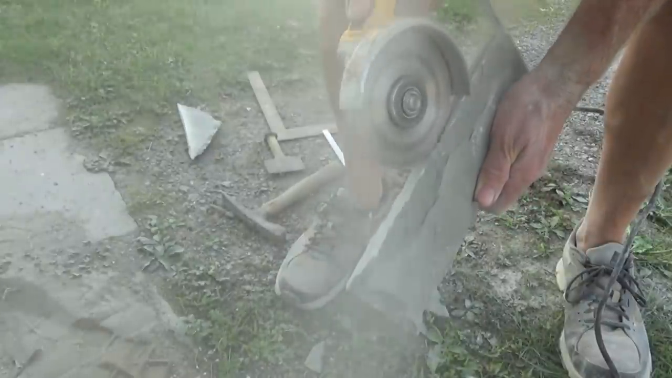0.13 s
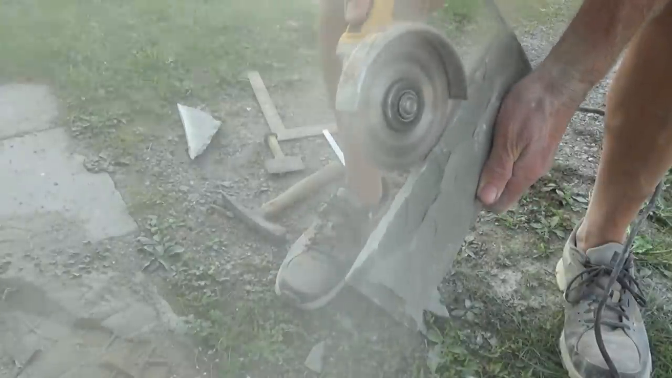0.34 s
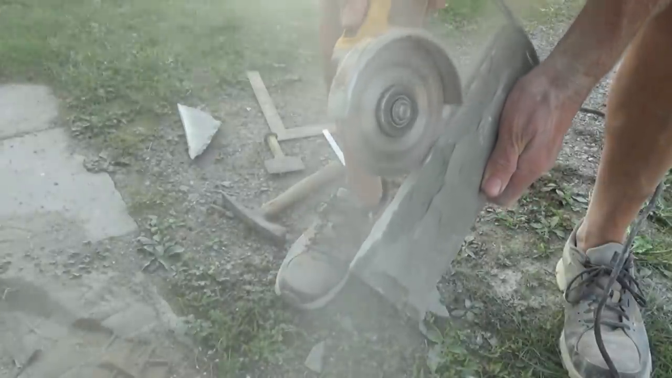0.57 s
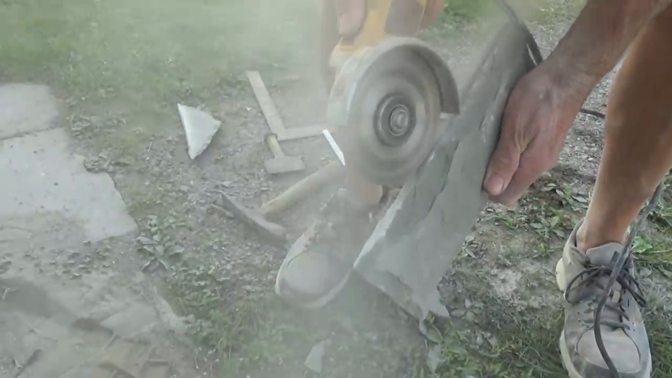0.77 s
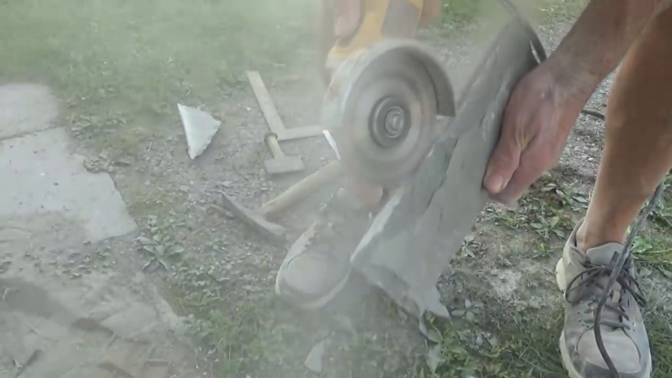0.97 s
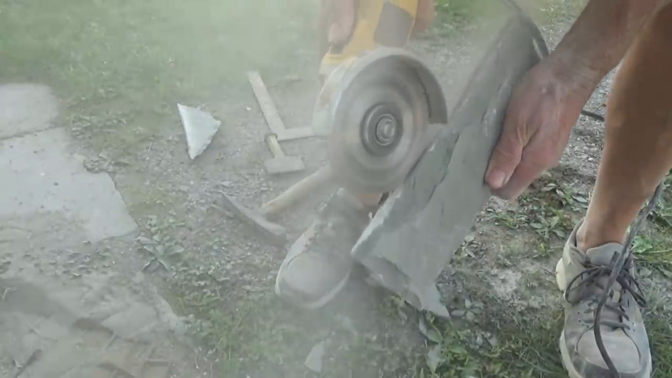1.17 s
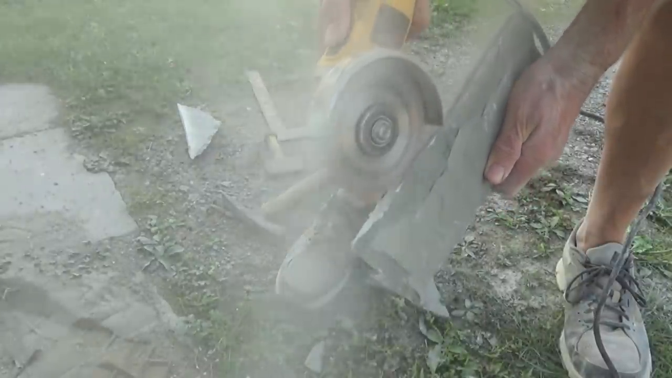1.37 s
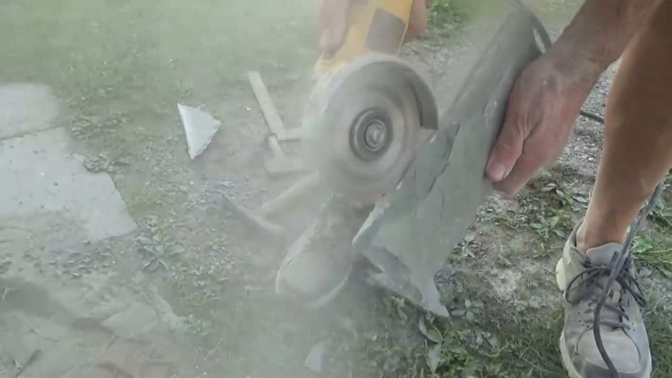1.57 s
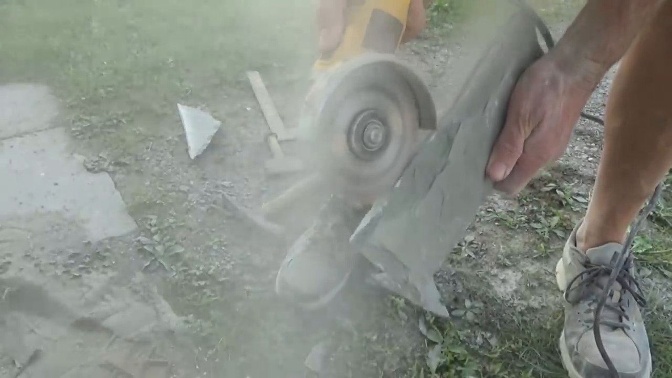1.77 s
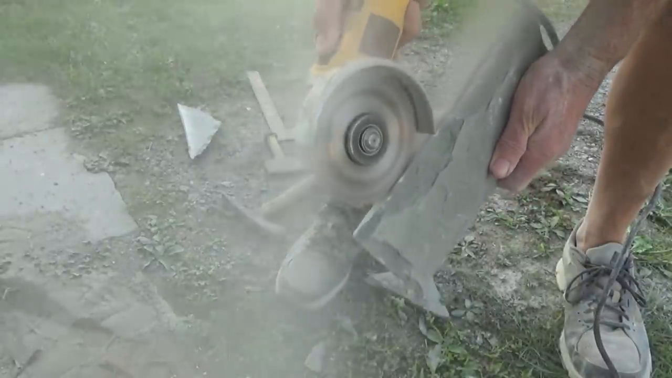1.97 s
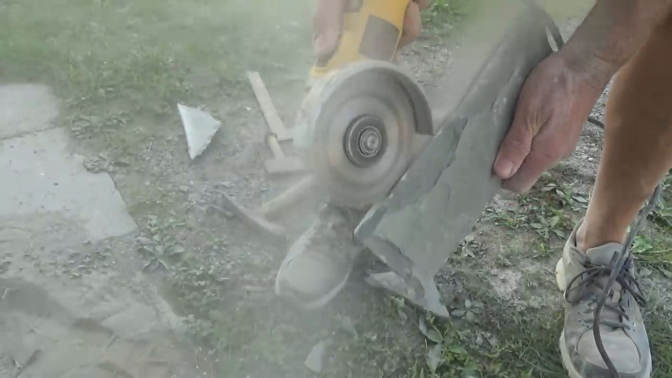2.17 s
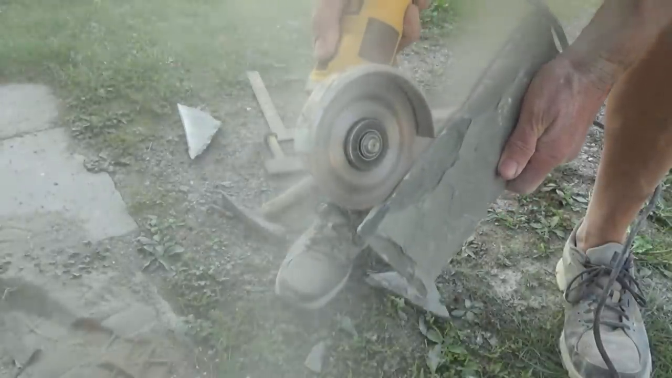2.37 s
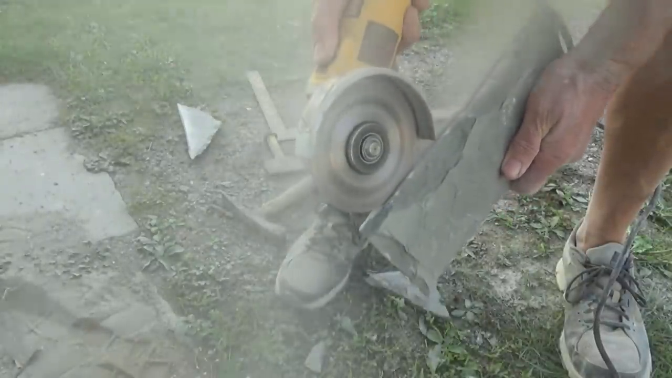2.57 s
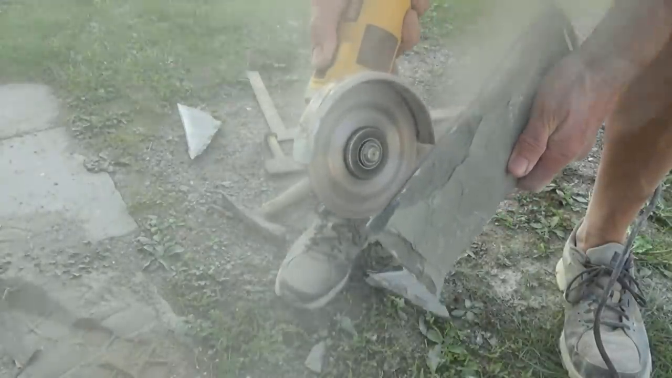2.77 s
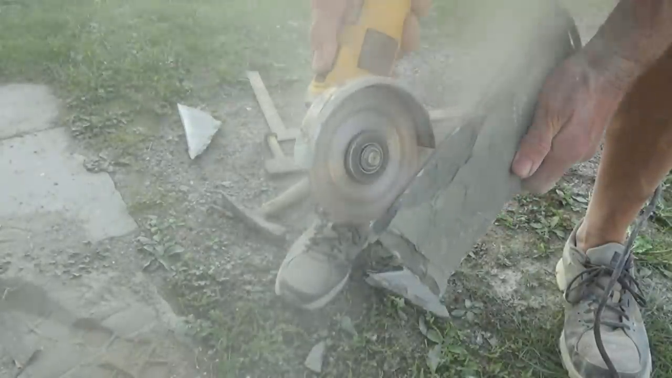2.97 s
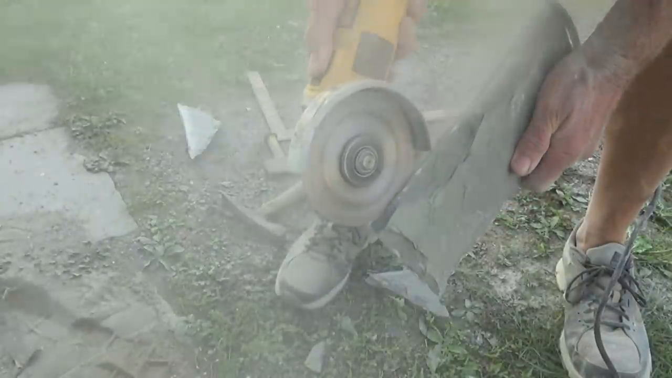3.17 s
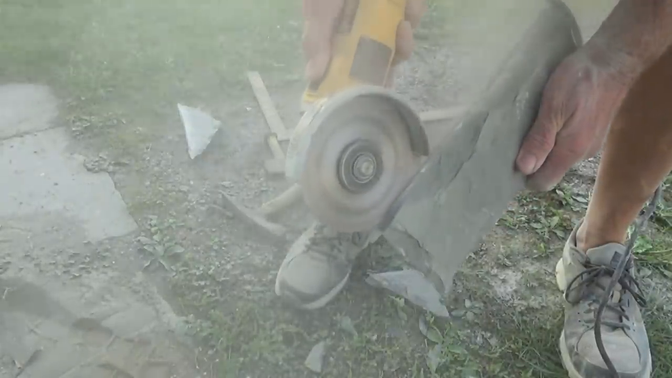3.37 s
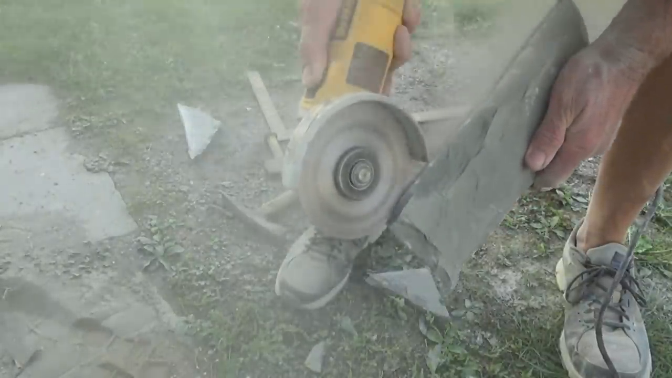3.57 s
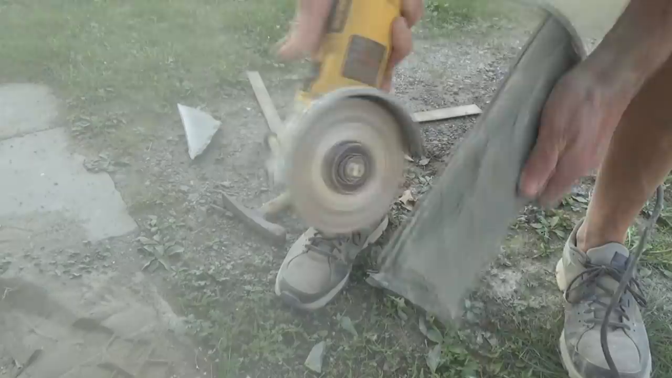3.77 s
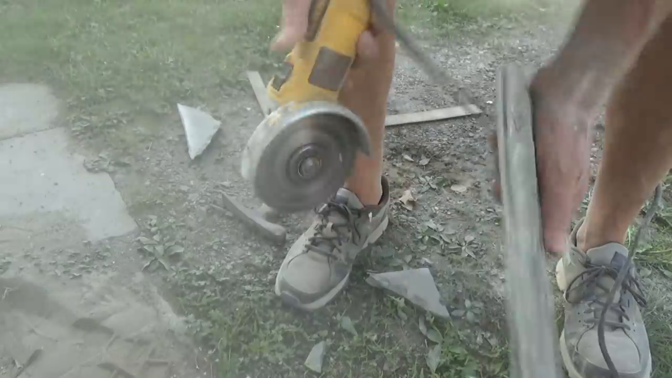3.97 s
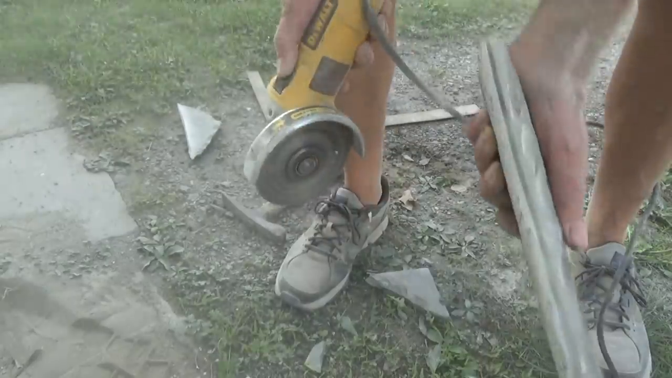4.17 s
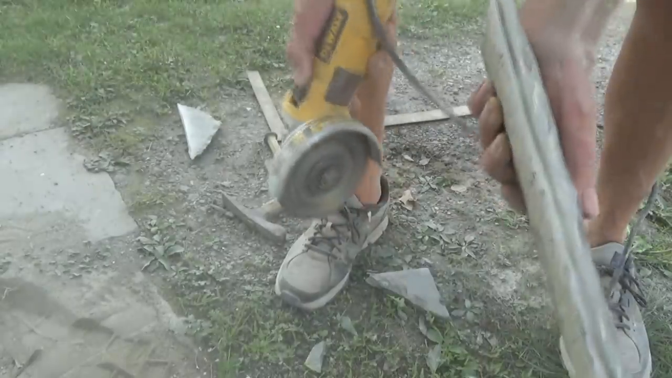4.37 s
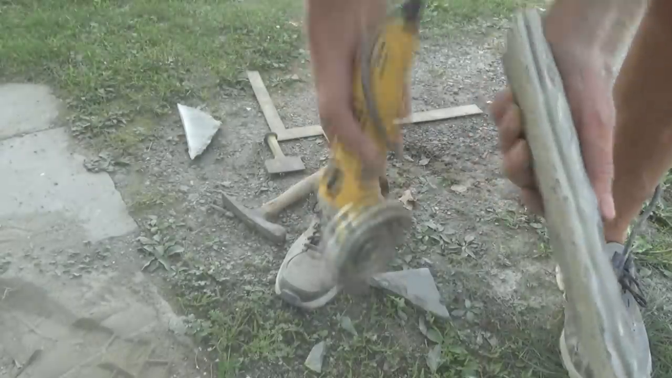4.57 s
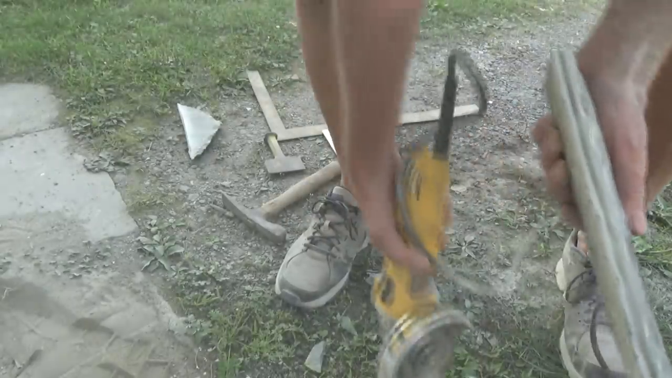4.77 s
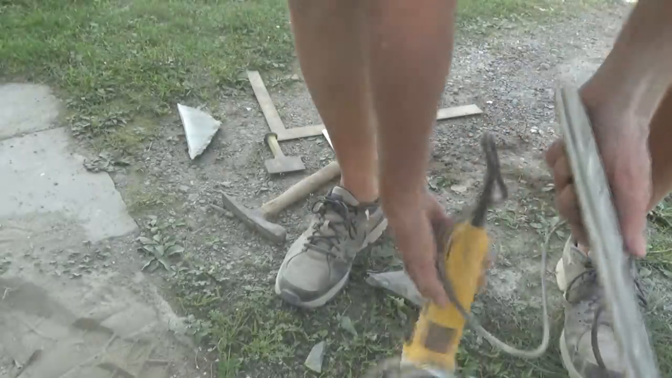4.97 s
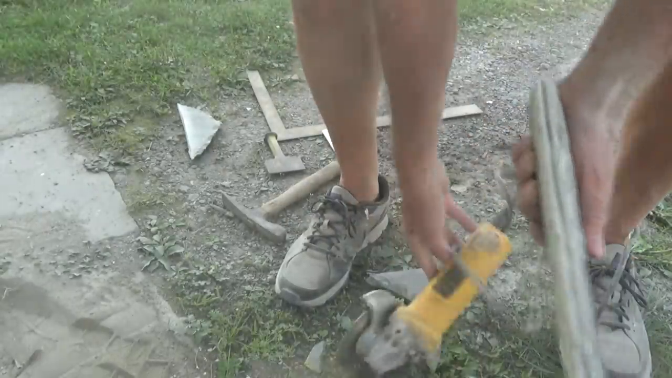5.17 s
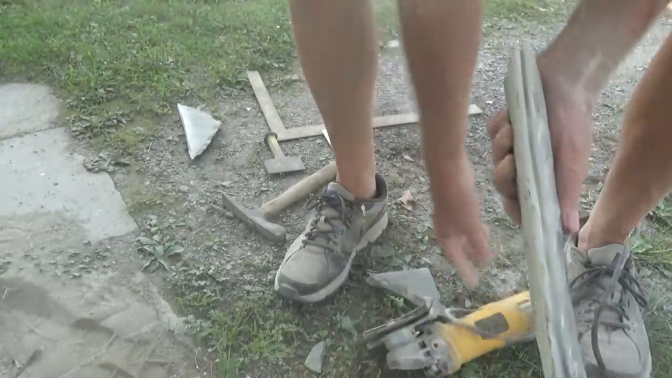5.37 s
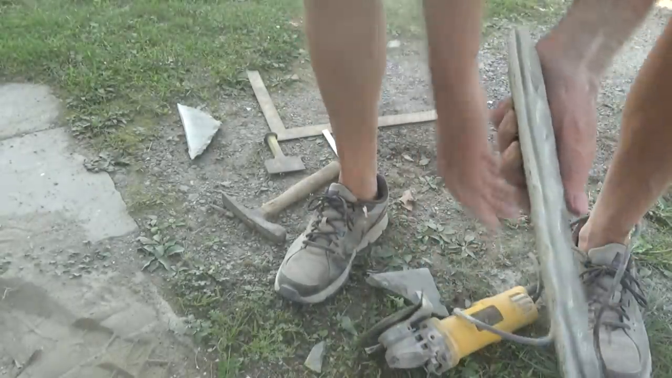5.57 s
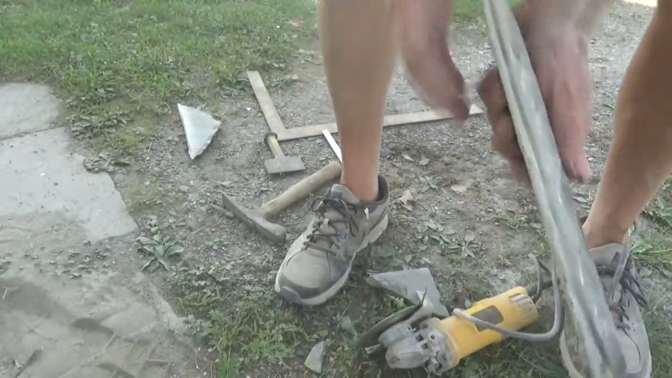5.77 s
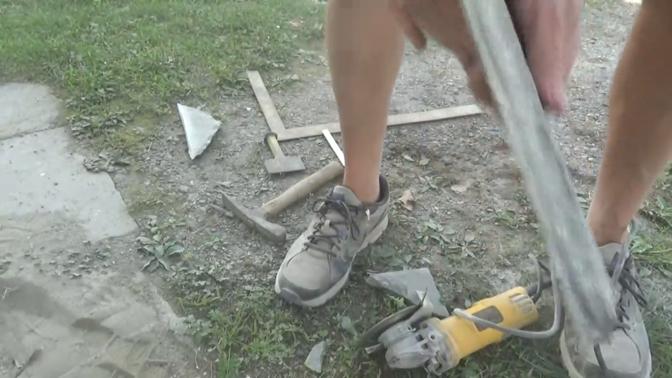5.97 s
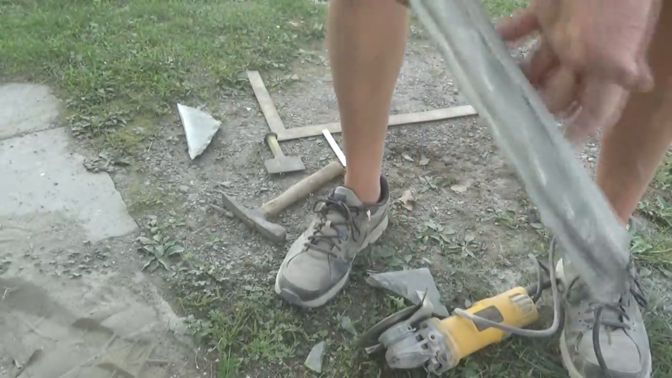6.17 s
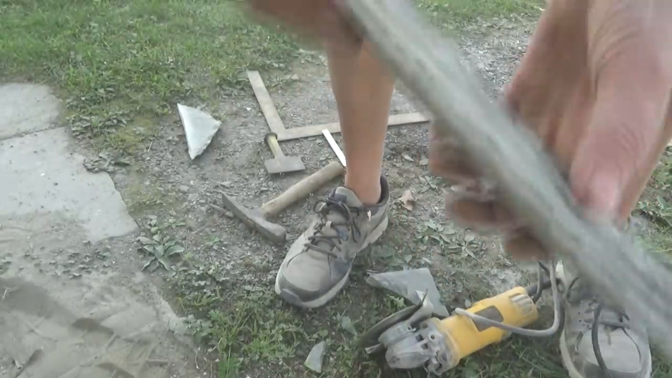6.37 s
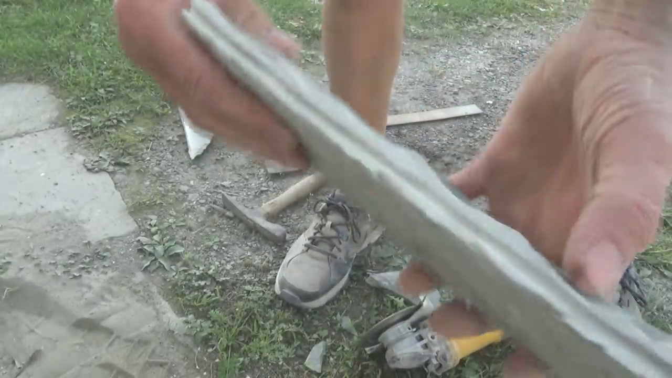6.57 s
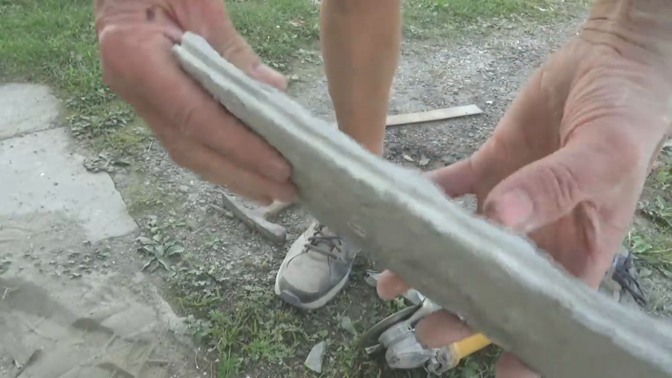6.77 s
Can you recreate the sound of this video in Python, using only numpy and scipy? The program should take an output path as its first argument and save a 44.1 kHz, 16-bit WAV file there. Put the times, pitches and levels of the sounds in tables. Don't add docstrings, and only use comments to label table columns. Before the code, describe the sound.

Outdoors, gritty ringing stone cutting gives way to a clattering motor whine, falling pitch, a metallic scrape, a soft thud and slowing gear rattle.

```python
import sys
import numpy as np
from scipy import signal
from scipy.fft import rfft, irfft, next_fast_len
from scipy.io import wavfile
from scipy.ndimage import uniform_filter1d, minimum_filter1d, map_coordinates

SR = 44100
rng = np.random.default_rng(int(sys.argv[2]) if len(sys.argv) > 2 else 0)


def level_to_linear(level):
    exponent = np.asarray(level, float) / 20
    return 10 ** exponent


def wav_out(sig):
    wavfile.write(sys.argv[1], SR, np.round(np.clip(np.atleast_2d(sig).T, -1, 1) * 32767).astype(np.int16))


N = 301199
T = np.arange(N) / SR

GEAR = 3.57
FREED_S, OFF_S, DOWN_S = 3.78, 4.31, 5.07
# f/Hz, level/dB per Hz
GRIT = [(900, -54), (1500, -13.5), (2700, -4), (3300, -2.5), (4500, -0.5), (5800, -2.5), (6400, 0.5),
        (7200, -1.5), (9100, -6.5), (11400, -6.5), (12600, -8.5), (13300, -14.5), (15500, -12.5),
        (16000, -58)]
# t/s, how far the fan outlet faces us/dB, loose gear level/dB, share of high clatter/dB
FREE = [(3.76, -7, -32, -3), (3.9, -5, -27.5, -7.5), (4.3, -7.5, -30.5, -6), (4.5, -6.5, -32, -8.5),
        (4.8, -5, -36, -12), (5.06, -3, -30, -22), (5.17, 1, -45, -18), (5.35, 0, -53.5, -20),
        (5.5, 2, -62, -18), (5.75, -1, -60, -20), (6.83, 0, -60, -20)]


def unit(x):
    return x / np.sqrt(np.mean(x ** 2) + 1e-20)


def along(points, hz):
    f, v = np.transpose(points)
    return np.interp(np.log(hz + 1), np.log(f + 1), v)


def levels(rows):
    s, *columns = np.transpose(rows)
    return [np.interp(T, s, c, left=-120, right=-120) for c in columns]


def before(s):
    return np.clip((s - T) / .03 + .5, 0, 1)


def wobble(rate):
    return map_coordinates(rng.standard_normal(int(N * rate / SR) + 4), [T * rate])


def filtered(x, response):
    m = next_fast_len(N + SR // 2)
    return irfft(rfft(x, m) * response(np.fft.rfftfreq(m, 1 / SR)), m)[..., :N]


def coloured(x, spectrum):
    return unit(filtered(x, lambda hz: level_to_linear(along(spectrum, hz))))


def modes(f, table):
    return sum((-1) ** k * level_to_linear(db) * 1j * f * w / (c * c - f * f + 1j * f * w)
               for k, (c, w, db) in enumerate(table))


def ringing(x, table):
    return filtered(x, lambda f: modes(f, table))


def blows(turns, jitter, scatter_db, life):
    at = np.flatnonzero(np.diff(np.floor(turns)))
    chance = rng.standard_normal((len(at), 2))
    place = np.clip(at + (jitter * SR * chance[:, 0]).astype(int), 0, N - 1)
    train = np.bincount(place, level_to_linear(scatter_db * chance[:, 1]), N)
    return unit(signal.lfilter([1], [1, -np.exp(-1 / (life * SR))], train))


def yard():
    # f/Hz, level/dB per Hz
    far_hum = [(20, -17), (60, -5.5), (200, -9), (500, -8), (1200, 5), (3000, -36)]
    return level_to_linear(-57.0 + 1.5 * wobble(2.6)) * coloured(rng.standard_normal(N), far_hum)


def fan(armature_hz):
    # f/Hz, level/dB per Hz
    air_fast = [(120, -58), (250, -46), (600, -27), (1280, -18), (3050, -12), (4190, -9), (5400, -15),
                (6140, -13), (8090, -17.5), (12400, -24.5), (14300, -33), (15000, -42), (16000, -60)]
    air_slow = [(150, -71), (400, -26.5), (900, -18.5), (1400, -17.5), (1900, -8), (2900, -10), (3800, -4),
                (4300, -3), (6400, -11.5), (8000, -5.5), (9800, -15), (13000, -31), (16000, -30)]
    facing_db, _, _ = levels(FREE)
    air_db = -23 + 13 * np.log2(armature_hz / 500) + facing_db
    fast = np.clip((armature_hz - 230) / 150, 0, 1)
    air = fast * coloured(rng.standard_normal(N), air_fast)
    air = air + (1 - fast) * coloured(rng.standard_normal(N), air_slow)
    return level_to_linear(air_db + 0.1 * wobble(48)) * air


def swell(hz):
    # f/Hz, half width/Hz, gain/dB
    casing = [(410, 60, 6), (1280, 110, 16), (1640, 80, 8), (3700, 180, 14), (4250, 200, 12),
              (7380, 200, 8), (10850, 300, 5), (12300, 500, 3)]
    return sum(db / (1 + ((hz - c) / w) ** 2) for c, w, db in casing)


def whine(armature_hz):
    multiples = [
        1,
        2,
        3,
        25,
        1 + 1 / 3.57,
    ]
    # level at 500 Hz/dB, rise per doubling/dB, change under power/dB, more in the stone/dB
    loudness = [
        (-47, 18, -4, -1),
        (-59, 17, 6, -13),
        (-56, 20, -3, -4),
        (2, 0, -5, -16),
        (-59, 45, -8, 0),
    ]
    # f/Hz, level/dB
    contacts = [(3800, -72), (4500, -68), (5000, -45), (5500, -42), (6100, -49), (7000, -40), (11000, -42),
                (14200, -42)]
    phase = 2 * np.pi * np.cumsum(armature_hz) / SR
    out = 0
    for k, (db, slope_db, power_db, stone_db) in zip(multiples, loudness):
        tone_hz = k * armature_hz
        level_db = db + slope_db * np.log2(armature_hz / 500)
        level_db = level_db + power_db * before(OFF_S) + stone_db * before(FREED_S)
        level_db = level_db + swell(tone_hz)
        if k == 25:
            level_db = level_db + along(contacts, tone_hz)
        out = out + level_to_linear(level_db + 0.61 * wobble(25)) * np.sin(k * phase + 0.14 * wobble(40))
    return out


def mesh(armature_hz, turns):
    lines = 0
    for k in range(27, 34):
        line_db = -.3 * (k - 30.5) ** 2 + .8 * swell(k * armature_hz / GEAR) + 2 * wobble(9)
        lines = lines + level_to_linear(line_db) * np.sin(2 * np.pi * k * turns + .5 * wobble(25))
    heard = before(DOWN_S) - before(FREED_S)
    return level_to_linear(-45.5 - 9 * before(OFF_S + .05)) * heard * lines


def loose_gears(turns):
    # f/Hz, width/Hz, level/dB
    housing = [(2710, 190, -2.5), (4090, 390, 7.5), (6300, 330, 3)]
    # f/Hz, width/Hz, level/dB
    guard = [(10500, 620, 12), (11900, 720, 7), (11500, 1600, 13)]
    _, gear_db, high_db = levels(FREE)
    clumps = blows(.55 * turns, jitter=.002, scatter_db=2.5, life=.0045)
    slaps = unit(clumps * blows(2.4 * turns, jitter=.001, scatter_db=2.5, life=.0018))
    slaps = np.tanh(slaps / 2.2) * rng.standard_normal(N)
    gear = unit(ringing(slaps, housing)) + level_to_linear(high_db) * unit(ringing(slaps, guard))
    gear = filtered(gear, lambda hz: 1 / (1 + (hz / 13500) ** 12))
    return level_to_linear(gear_db) * gear


def brush(turns):
    # t/s, rise/s, time to fall 60 dB/s, disc ring level/dB, housing level/dB
    touches = [
        (5.064, .002, .12, -22, -19),
        (5.072, .012, .045, -16, -23),
        (5.092, .006, .4, -42, -27),
        (5.1185, .003, .07, -14, -34),
        (5.14, .012, .08, -34, -26),
        (5.16, .01, .6, -29, -46),
    ]
    # f/Hz, width/Hz, level/dB
    free_disc = [(4743, 60, -1), (5324, 80, 0), (5950, 50, -8), (6471, 50, -8), (6799, 45, -1),
                 (7531, 40, -5), (8600, 30, -1), (9372, 30, -9), (11310, 30, -8), (12000, 40, -12),
                 (13300, 25, -11), (14410, 40, -17), (15560, 50, -20)]
    stilled_s = 5.27
    ring, shake = 0, 0
    for s, rise, t60, ring_db, shake_db in touches:
        swelling = np.clip((T - s) / rise, 0, 1) ** 2
        touch = swelling * level_to_linear(-60 * np.clip(T - s - rise, 0, None) / t60)
        ring = ring + level_to_linear(ring_db) * touch
        shake = shake + level_to_linear(shake_db) * touch
    disc = level_to_linear(16) * before(stilled_s) * ringing(ring * rng.standard_normal(N), free_disc)
    scrape = level_to_linear(-5) * ring * before(DOWN_S + .085) * coloured(rng.standard_normal(N), GRIT)
    skip = .3 + np.tanh(blows(1.7 * turns, jitter=.0003, scatter_db=1.5, life=.0022))
    body = ringing(shake * skip * rng.standard_normal(N), [(3150, 830, 11.5), (3850, 250, 15.0)])
    return disc + scrape + body


def thud():
    # t/s, level/dB, f/Hz, time to fall 60 dB/s
    landings = [
        (5.412, -31, 195, 0.024),
    ]
    noise = rng.standard_normal(N)
    soil = 2 * uniform_filter1d(noise, size=12) - 2 * uniform_filter1d(noise, size=48)
    out = 0
    for s, db, hz, t60 in landings:
        t = np.clip(T - s, 0, None)
        fade = level_to_linear(db - 60 * t / t60) * (1 - np.exp(-t / 0.0036))
        out = out + fade * (np.sin(2 * np.pi * hz * t) + soil)
    return out


def knocks():
    # t/s, case level/dB, cover level/dB, lighter ticks before the next/count
    hard = [(5.1944, -24, -30, 1), (5.2196, -21, -26, 3), (5.2673, -24, -24, 1), (5.2944, -21, -21, 1),
            (5.3161, -22, -26, 1), (5.3459, -25, -33, 2), (5.4061, -25, -23, 1), (5.4346, -23, -26, 3),
            (5.4839, -26, -23, 0), (5.4983, -24, -26, 1), (5.5578, -33, -24, 0), (5.5881, -26, -24, 3),
            (5.6903, -22, -28, 1), (5.7174, -24, -30, 2), (5.8078, -27, -32, 1), (5.8659, -22, -27, 1),
            (5.9263, -24, -29, 2), (5.9849, -31, -23, 3), (6.0534, -23, -37, 1), (6.0942, -29, -27, 4),
            (6.1951, -30, -26, 7), (6.3502, -30, -26, 2), (6.4389, -28, -25, 0), (6.4656, -23, -35, 1),
            (6.5179, -25, -29, 1), (6.5809, -29, -24, 1), (6.6462, -28, -25, 0), (6.6765, -26, -28, 3),
            (6.7839, -26, -32, 0), (6.8095, -28, -27, 0)]
    s, case_db, cover_db, _ = np.transpose(hard)
    ticks = np.concatenate([np.linspace(a[0], b[0], a[3] + 2)[1:-1] - .002 for a, b in zip(hard, hard[1:])])
    chance = 1.8 * rng.standard_normal((len(s) + len(ticks), 3))
    light = chance[len(s):] - 3 * (ticks[:, None] - DOWN_S)
    s = np.r_[s, ticks]
    handle_db = -47 + 6.5 * (s - DOWN_S) + chance[:, 1]
    return s, np.r_[case_db, -25.5 + light[:, 0]], handle_db, np.r_[cover_db, -26 + light[:, 2]]


def rattle():
    # f/Hz, width/Hz, level/dB
    parts = [
        [(2300, 400, -9), (2950, 280, -2), (3600, 260, -2), (3870, 260, 0), (4400, 240, -4), (4750, 200, -4)],
        [(1400, 330, 0)],
        [(5450, 300, -2), (5700, 250, 0), (6200, 350, 0), (6500, 350, -1), (7100, 500, -9)],
        [(10800, 1200, 0), (12200, 1500, -3)],
    ]
    loudness_db = [
        3.5,
        0.5,
        2,
        -18,
    ]
    s, case_db, handle_db, cover_db = knocks()
    size = 2048
    t, hz = np.arange(size) / SR, np.fft.rfftfreq(size, 1 / SR)
    fade = level_to_linear(-60 * t / 0.0088) + 0.29 * level_to_linear(-60 * t / 0.073)
    shape = (1 - np.exp(-t / 0.00041)) * fade * (t < .03)
    burst = rfft(shape * rng.standard_normal((len(s), size)))
    no_bass = (1j * hz / (1j * hz + 900)) ** 3
    at = ((s * SR).astype(int)[:, None] + np.arange(size)).ravel()
    out = np.zeros(N + size)
    for part, db, own_db in zip(parts, [case_db, handle_db, cover_db, cover_db], loudness_db):
        knock = irfft(burst * no_bass * modes(hz, part) ** 2, size)
        knock = knock * (level_to_linear(db + own_db) / np.abs(knock).max(axis=1))[:, None]
        out += np.bincount(at, knock.ravel(), N + size)[:N + size]
    return out[:N]


def slab_rumble(turns, ring_db):
    # f/Hz, level/dB per Hz
    rumble = [(18, -47), (30, -7), (439, -2.5), (482, -2.5), (955, 1.5), (1380, 2), (2080, 2), (2500, -35),
              (3250, -32), (5500, -120)]
    split_s = 1.5
    whole, loose = (972, 74, -8.5), (2095, 140, -3)
    slab_db = -35 + 0.94 * (ring_db + 14) - 14 * (1 - before(FREED_S + .02))
    jolts = .85 + .6 * blows(turns / 2, jitter=0.0027, scatter_db=3.5, life=.004)
    slab = coloured(jolts * level_to_linear(0.98 * wobble(40)) * rng.standard_normal(N), rumble)
    for (hz, width, db), share in ((whole, before(split_s)), (loose, 1 - before(split_s))):
        note = signal.lfilter(*signal.iirpeak(hz, hz / width, SR), jolts * rng.standard_normal(N))
        slab = slab + level_to_linear(db) * share * unit(note)
    return level_to_linear(slab_db) * slab


def cut(turns):
    # t/s, disc ring level/dB, depth as gain of the low notes/dB
    cutting = [(0, -15, 0), (.25, -14.5, 1.5), (.32, -16, 1.5), (.45, -15.5, 0.5), (.9, -15, 0),
               (1.1, -14.5, 1), (1.5, -14.5, 1), (1.57, -15.5, 2.5), (2.05, -13.5, 1.5), (2.5, -14, 1.5),
               (2.75, -10, 1.5), (3.2, -11.5, 1.5), (3.5, -7, 2), (3.72, -13, 0.5), (3.78, -15, -0.5),
               (3.805, -23.5, 3), (3.84, -36, 13.5)]
    disc_hz = [2090, 3510, 3750, 3950, 4290, 4810, 5310, 6050, 6660, 7700, 8435, 8690, 9450, 9700, 10530,
               11030, 12040, 12920, 13710, 14680]
    # width/Hz, level/dB
    disc_notes = [(140, -20), (200, -2), (350, -2), (300, -2), (150, -1), (220, -1), (130, -5), (150, 0),
                  (110, -2), (140, 1), (70, -6), (90, -11), (100, -16), (110, -4), (100, -7), (110, -16),
                  (100, -14), (220, -19), (130, -23), (110, -20)]
    ring_db, depth_db = levels(cutting)
    hard = blows(turns / 2, jitter=.002, scatter_db=2, life=0.0033)
    gentle = blows(turns, jitter=.001, scatter_db=-0.5, life=0.0012)
    bite = unit((0.82 + 1.12 * hard + 0.38 * gentle) * level_to_linear(1.24 * wobble(34.15)))

    def steel(f):
        return np.array([sum(level_to_linear(db) * modes(f, [(hz, width, 0)]) ** 2
                             for hz, (width, db) in zip(disc_hz[k::2], disc_notes[k::2]))
                         for k in range(2)])

    drift = level_to_linear(0.66 * np.array([wobble(3.17), wobble(3.15)]))
    ring = unit(filtered(bite * drift * rng.standard_normal((2, N)), steel).sum(axis=0))
    ring = ring + (level_to_linear(depth_db) - 1) * filtered(ring, lambda hz: hz < 5050)
    grit = coloured(bite * rng.standard_normal(N), GRIT)
    return level_to_linear(ring_db) * (ring + level_to_linear(-7.0) * grit) + slab_rumble(turns, ring_db)


def spread(x, wide):
    # f/Hz, level/dB
    lean = [(60, -1), (380, 0.5), (2380, -1), (15000, 0.5)]
    z = signal.stft(x, nperseg=512)[2]
    scrambled = z * np.exp(2j * np.pi * rng.random(z.shape))
    other = signal.istft(scrambled, nperseg=512)[1][:N]
    side = filtered(other, lambda hz: level_to_linear(along(wide, hz) + 2.5))
    return filtered(np.array([x + side, x - side]), lambda hz: level_to_linear(np.outer([.5, -.5], along(lean, hz))))


def scene():
    # t/s, f/Hz
    speed = [(0, 449), (1.2, 438), (3.6, 441), (3.75, 471.8), (3.88, 500.3), (4.0, 525.6), (4.15, 548.9),
             (4.31, 568.1), (4.55, 512.6), (4.78, 465.5), (5.05, 415.4), (5.16, 312), (5.43, 281.3),
             (5.76, 244.9), (6.04, 217.6), (6.3, 194), (6.55, 174.2), (6.83, 152)]
    # f/Hz, side minus middle/dB
    wide_cut = [(60, -22), (110, -17), (200, -11.5), (380, -7.5), (700, -7), (1290, -11.5), (2380, -21.5),
                (4400, -21.5), (8120, -25), (15000, -32)]
    wide_free = [(60, -20), (150, -32), (380, -21), (950, -20), (2380, -16.5), (5980, -21.5),
                 (15000, -21.5)]
    armature_hz = np.interp(T, *np.transpose(speed))
    turns = np.cumsum(armature_hz) / GEAR / SR
    machine = fan(armature_hz) + whine(armature_hz) + mesh(armature_hz, turns) + loose_gears(turns)
    laid_down = brush(turns) + thud() + rattle()
    return spread(yard() + machine + laid_down, wide_free) + spread(cut(turns), wide_cut)


def roll_off(x):
    return signal.sosfilt(signal.butter(12, 16100, fs=SR, output="sos"), x)


def record(dry):
    low = filtered(dry.mean(axis=0) ** 2,
                   lambda hz: 1 / (1 + (45 / (hz + 1)) ** 4) / (1 + (hz / 500) ** 2))
    bent = dry + level_to_linear(-30.0) * low
    need = np.minimum(1, .66 / (np.abs(bent).max(axis=0) + 1e-9))
    gain = uniform_filter1d(minimum_filter1d(need, size=90), size=60)
    mix = filtered(bent * gain, lambda hz: hz < 15760)
    return roll_off(mix)


dry = scene()
out = record(dry)
wav_out(out)
```